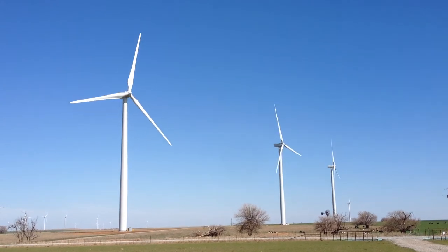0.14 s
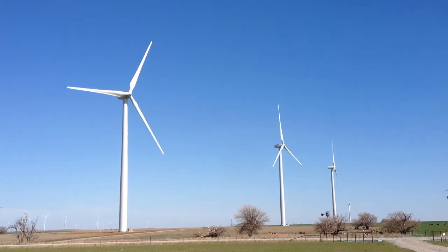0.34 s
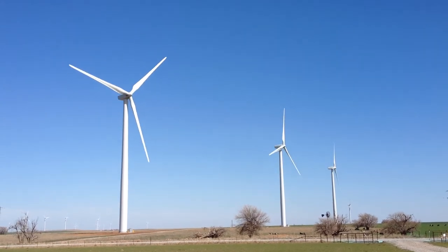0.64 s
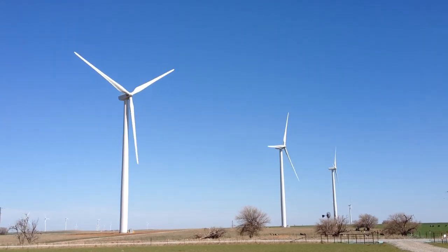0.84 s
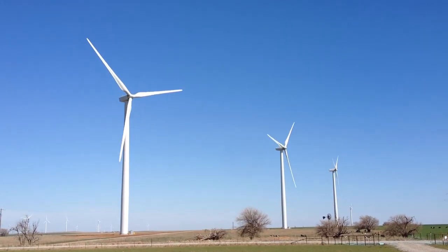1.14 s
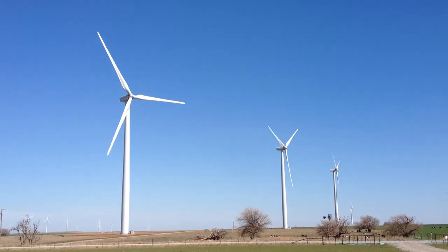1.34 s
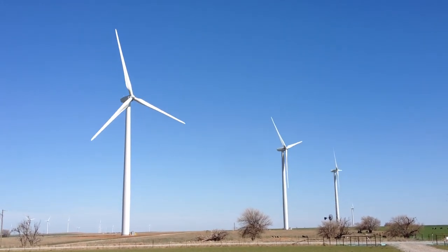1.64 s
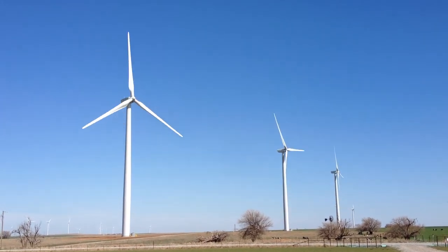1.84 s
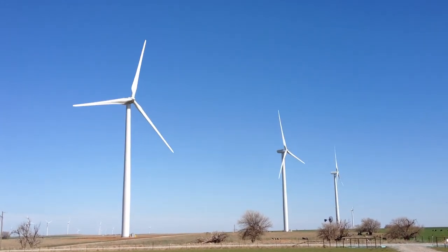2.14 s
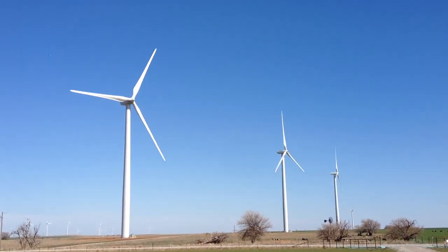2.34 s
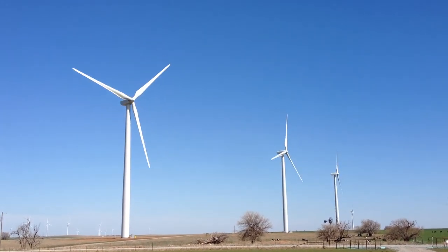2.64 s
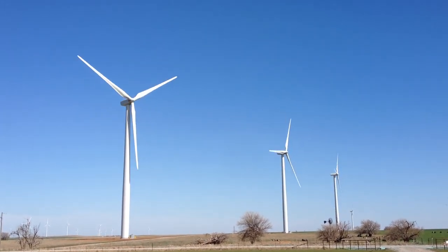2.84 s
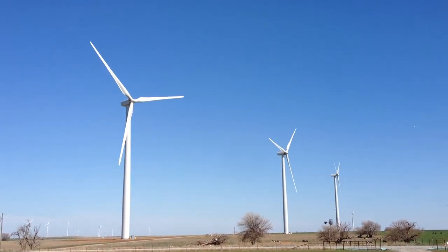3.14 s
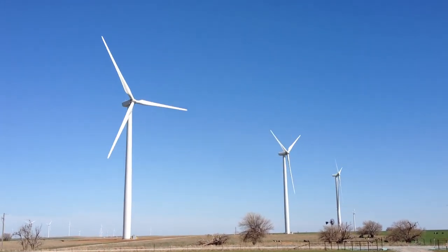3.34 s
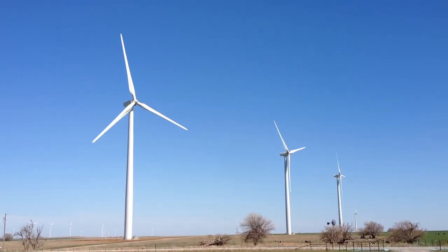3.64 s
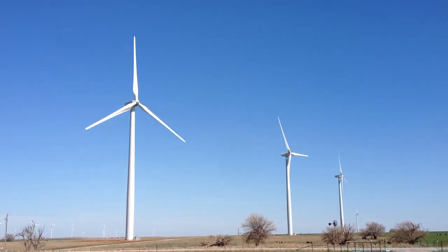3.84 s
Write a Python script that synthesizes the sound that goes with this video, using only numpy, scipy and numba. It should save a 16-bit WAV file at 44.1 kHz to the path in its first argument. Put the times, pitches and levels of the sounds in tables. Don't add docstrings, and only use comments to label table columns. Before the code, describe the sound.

Heavy wind gusts thump and flutter on a small microphone, then die away to faint hiss

```python
import sys
import numpy as np
from scipy import signal
from scipy.fft import rfft, irfft
from scipy.io import wavfile
from scipy.ndimage import uniform_filter1d, minimum_filter1d
from numba import njit

SR = 44100
rng = np.random.default_rng(int(sys.argv[2]) if len(sys.argv) > 2 else 0)


def amplitude_ratio(level_db):
    exponent = np.asarray(level_db, float) / 20
    return 10 ** exponent


def master(y):
    cut = np.clip(np.atleast_2d(y).T, -1, 1)
    pcm = np.round(cut * 32767)
    wavfile.write(sys.argv[1], SR, pcm.astype(np.int16))


N = 176400

# (frequency [Hz], density [dB per Hz])
FIELD_SPECTRUM = [(40, -37), (90, -14), (200, -10.5), (500, -15.5), (1200, -22), (2400, -20.5),
                  (3100, -39.5), (5000, -27)]
# (frequency [Hz], density [dB per Hz])
HISS_SPECTRUM = [(3000, -54), (6000, -35.5), (8500, -37.5), (10000, -44), (12000, -38), (15500, -35.5)]
# (time [s], length [s], level [dB], centre [Hz])
BLADE_SWISHES = [
    (.14, .04, -71, 3500),
    (1.35, .22, -66, 1900),
    (1.22, .08, -69, 2800),
    (2.73, .11, -61, 1950),
    (2.58, .09, -69, 1550),
    (.513, .004, -66, 4300),
]
# (time [s], pitch [Hz], level [dB])
BIRD_PEEP = [(1.0, 4400, -85), (1.032, 4500, -72), (1.05, 4380, -72), (1.086, 4530, -64), (1.1, 4420, -80),
             (1.13, 4400, -66), (1.166, 4380, -61), (1.25, 4260, -70), (1.3, 4250, -82)]
# (time [s], peak [dB], ring [Hz], ring t60 [s])
CASE_TICKS = [(1.254, -56.5, 6500, 0.0062), (3.479, -51, 9300, 0.028), (3.4864, -38, 4570, 0.028),
              (3.503, -46, 3970, 0.021), (3.524, -53, 3740, 0.016), (3.6272, -39, 3900, 0.022),
              (3.628, -38.5, 2440, 0.0093), (3.621, -60, 9100, .015), (3.585, -63, 3000, .01),
              (3.646, -58, 4000, .015), (3.894, -53, 4840, 0.013), (3.915, -54, 5630, 0.018)]
# (time [s], length [s], level [dB], pitch [Hz], glide [Hz per s])
WHISTLE_STRANDS = [(.26, .04, -66, 2110, 0), (1.06, .05, -69, 1670, 500), (1.2, .035, -68, 1670, -500),
                   (1.16, .045, -67, 2070, 300), (1.11, .04, -70, 1860, 0), (1.33, .06, -67, 1940, 0),
                   (1.47, .06, -70, 1850, 0), (1.54, .045, -69, 1640, 100), (1.73, .03, -71, 1850, 300),
                   (1.69, .03, -69, 2570, 0), (2.13, .04, -73, 1560, 0), (2.52, .05, -71, 1500, 0),
                   (2.63, .035, -68, 2030, 700), (2.77, .03, -70, 1500, 0), (2.74, .04, -70, 1850, 900),
                   (3.07, .035, -67, 2700, 900), (3.26, .03, -70, 2800, 900), (3.1, .06, -70, 2400, -200),
                   (.125, .015, -66, 3320, -1500), (.185, .015, -69, 3700, -1500),
                   (3.95, .03, -82, 4900, -3000)]
# (time [s], pitch [Hz], level [dB])
EDGE_WHISTLE = [(0, 2260, -56), (.1, 2158, -56), (.19, 1913, -55), (.33, 1877, -59.5), (.45, 1959, -55.5),
                (.69, 2105, -56.5), (.93, 1962, -60.5), (1.0, 2232, -62), (1.15, 2354, -62),
                (1.82, 2340, -61.5), (1.92, 2438, -53.5), (2.08, 2440, -56.5), (2.2, 2505, -70.5),
                (2.62, 2510, -50), (2.9, 2540, -60), (3.08, 2580, -59), (3.42, 2510, -61), (4, 2485, -74)]
# (time [s], level [dB])
EARLY_SNAPS = [(0.016, -19), (0.033, -29), (0.066, -20), (0.087, -21), (0.096, -23), (0.105, -19.5),
               (0.119, -22.5), (0.143, -20.5), (0.16, -15.5), (0.184, -19), (0.225, -37), (0.238, -19),
               (0.276, -42), (0.286, -36), (0.345, -20.5), (0.4, -17), (0.44, -21), (0.47, -19.5),
               (0.495, -21), (0.522, -17.5), (0.544, -18), (0.657, -24), (0.694, -22.5), (0.702, -21.5),
               (0.766, -22)]
# (time [s], level [dB])
LATE_SNAPS = [(0.781, -21.5), (0.81, -18.5), (0.816, -18.5), (0.831, -18), (0.893, -17), (0.904, -21.5),
              (0.915, -19), (0.923, -22.5), (0.951, -18), (0.969, -19.5), (0.981, -17.5), (1.012, -20),
              (1.057, -40), (1.067, -22), (1.094, -35), (1.202, -21.5), (1.239, -40), (1.255, -22),
              (1.287, -21), (1.318, -23), (1.343, -22.5), (1.471, -22), (1.541, -28), (1.604, -26),
              (1.62, -22.5), (1.671, -22.5), (1.791, -27), (1.871, -22.5), (1.881, -21.5), (1.89, -23.5),
              (1.941, -26), (2.025, -27), (2.09, -26.5), (1.902, -22.5), (1.987, -22)]
# (time [s], level [dB], extra sharpness [dB])
WIND_BED = [(0, -25.5, 0), (.3, -25.5, -0.5), (.62, -33.5, -1.5), (.8, -35, 3), (.99, -29.5, 4),
            (1.05, -40.5, -3.5), (1.3, -35, 1.5), (1.42, -45.5, -6.5), (1.72, -45, -10), (1.77, -45, -8),
            (2.17, -32, -11), (2.22, -49, -12), (2.34, -61, -3), (2.5, -58.5, -20.5), (2.52, -45, -9.5),
            (2.72, -54.5, -15.5), (2.84, -60.5, -12), (4, -59.5, -15.5)]
# (time [s], peak [dB])
STRONG_BUFFETS = [(0.035, -16), (0.097, -10), (0.164, -5.5), (0.226, -10.5), (0.265, -13), (0.296, -19),
                  (0.352, -17.5), (0.404, -15.5), (0.439, -9.5), (0.521, -7.5), (0.543, -10.5),
                  (0.607, -16.5), (0.661, -24.5), (0.722, -14), (0.765, -19.5), (.797, -9), (0.841, -11),
                  (0.874, -15.5), (.954, -16.5), (0.982, -7.5), (1.014, -13), (1.062, -21.5),
                  (1.094, -16.5), (1.129, -23.5)]
# (time [s], peak [dB])
FALLING_BUFFETS = [(1.195, -23.5), (1.243, -17.5), (1.291, -17), (1.32, -15), (1.341, -27), (1.367, -27.5),
                   (1.405, -34), (1.428, -26), (1.476, -18), (1.544, -29.5), (1.608, -24.5), (1.676, -16.5),
                   (1.797, -20.5), (1.822, -24), (1.858, -23), (1.884, -16), (1.988, -18), (2.025, -22.5),
                   (2.049, -17.5), (2.092, -22.5), (2.17, -27), (2.24, -40), (2.274, -42), (2.306, -36),
                   (2.533, -32), (2.591, -27), (2.646, -29.5), (2.683, -28.5), (2.717, -29.5), (3.125, -36)]
# (time [s], peak [dB])
FURTHER_BUFFETS = [(2.78, -44.5), (3.086, -43.5), (3.283, -40), (3.855, -42.5), (3.95, -40), (0.015, -15.5),
                   (0.468, -27), (0.494, -23), (0.81, -9.5), (0.894, -17.5), (1.961, -20.5), (2.559, -33.5)]
# (time [s], peak [dB])
SHOULDER_BUFFETS = [(0.055, -19), (0.074, -17), (0.121, -22), (.14, -19), (.181, -11), (0.25, -20.5),
                    (.325, -27), (.372, -22.5), (0.427, -25), (0.453, -16.5), (.565, -21), (.586, -20.5),
                    (.703, -19.5), (0.746, -24), (0.828, -16), (0.853, -22), (0.884, -13), (.908, -19),
                    (.93, -24), (0.994, -22.5), (1.033, -29), (1.177, -25), (1.22, -25), (1.259, -17),
                    (1.275, -30), (1.447, -26.5), (1.495, -29.5), (1.623, -37), (1.656, -30.5),
                    (1.701, -24), (1.76, -23), (1.776, -25), (1.84, -23.5), (1.903, -25), (1.925, -30.5),
                    (1.94, -21), (2.003, -40), (2.07, -32.5), (2.115, -31.5), (2.142, -32), (2.18, -23.5),
                    (2.202, -34.5), (2.611, -42.5), (2.666, -46.5)]
# (passing time [s], share in strong wind [dB], extra growth [dB per dB], rate [eddies per s])
EDDY_SIZES = [
    (0.0018, -4.5, 0., 1000),
    (0.00078, -6.5, 1, 900),
    (0.00043, -16.5, 2.5, 500),
]

MIC_LOW_HZ, PORT_TOP_HZ = 174, 2220
RING_HZ, RING_WIDTH_HZ, RING_SHARE = 164, 99, 0.27
SLOT_HZ, SLOT_WIDTH_HZ, SLOT_SHARE = 545, 310, 0.39
BUFFET_S, BUFFET_DB, FLUTTER_DB = 0.0076, -4, 3.5
EDDY_SCATTER_DB, EVEN_S = 1, 0.01
SNAP_S, SNAP_SHRINK_PER_DB, SNAP_SCATTER, SNAP_DB = 0.00034, 0.17, 0.013, 12
WHISTLE_WIDTH_HZ, WHISTLE_DB, STRAND_WIDTH_HZ = 32, -1, 70
SKIRT_WIDTH_HZ, SKIRT_DB = 600, -4.5
WAVER_DB, WAVER_PER_S = 1.3, 25
CRACK_DB, FIELD_DB = 7.5, -58
LIMIT, LIMIT_S = 0.68, 0.008
FADE_IN_S, FADE_IN_SHARE = 0.00067, 0.66
RUMBLE_HZ, TOP_HZ = 58, 15340


def curve(rows, col):
    rows = np.array(rows, float)
    return np.interp(np.arange(N) / SR, rows[:, 0], rows[:, col])


@njit
def svf(x, hz, width):
    y, b, l = np.empty(len(x)), 0., 0.
    for i in range(len(x)):
        g, k = np.tan(np.pi * hz[i] / SR), width[i] / hz[i]
        v = (b + g * (x[i] - l)) / (1 + g * (g + k))
        b, l, y[i] = 2 * v - b, l + 2 * g * v, k * v
    return y


def smooth(x, size, times):
    for _ in range(times):
        x = uniform_filter1d(x, size)
    return x


def band(hz, width_hz, order=1, even_s=0.21):
    x, one = rng.standard_normal(N), np.ones(N)
    for _ in range(order):
        x = svf(x, np.clip(hz * one, 30, 18000), np.clip(width_hz * one, 5, 9000))
    power = smooth(x ** 2, int(even_s * SR), 2)
    return x / np.sqrt(power + 1e-12)


def walk(rate):
    hold = int(SR / rate)
    levels = rng.standard_normal(N // 50)[:N // hold + 1]
    return 2.36 * smooth(np.repeat(levels, hold), hold, 2)[:N]


def hump(at_s, length_s):
    out, i, reach = np.zeros(N), int(at_s * SR), int(5 * length_s * SR)
    k = np.arange(max(i - reach, 0), min(i + reach, N))
    out[k] = np.exp(-.5 * ((k / SR - at_s) / length_s) ** 2)
    return out


def log_interp(hz, spectrum):
    table_hz, table_db = np.transpose(spectrum)
    return np.interp(np.log(hz), np.log(table_hz), table_db)


def floor():
    field, swell = 0, walk(1.46)
    for hz in 45 * 2 ** np.arange(0, 7, .5):
        level_db = log_interp(hz, FIELD_SPECTRUM) + 0.5 * swell + 0.45 * walk(12)
        field = field + amplitude_ratio(level_db) * np.sqrt(hz / 200) * band(hz, hz / 2, order=2)
    f = np.arange(N // 2 + 1) * SR / N + 1
    gain = amplitude_ratio(log_interp(f, HISS_SPECTRUM))
    hiss = np.sqrt(SR / 150) * irfft(rfft(rng.standard_normal(N)) * gain, N)
    return amplitude_ratio(FIELD_DB) * (field + hiss)


def swishes():
    return sum(amplitude_ratio(db) * hump(s, length) * band(hz, 0.19 * hz, order=2)
               for s, length, db, hz in BLADE_SWISHES)


def bird():
    t = np.arange(N) / SR
    gate = (t > BIRD_PEEP[0][0]) & (t < BIRD_PEEP[-1][0])
    hz = curve(BIRD_PEEP, 1) + 15 * walk(65)
    tone = np.sqrt(2) * np.sin(2 * np.pi * np.cumsum(hz) / SR)
    return gate * amplitude_ratio(curve(BIRD_PEEP, 2)) * tone


def ticks():
    out, t = np.zeros(N), np.arange(SR // 30) / SR
    one = np.ones(len(t))
    for s, db, hz, t60 in CASE_TICKS:
        noise = rng.standard_normal(len(t))
        fall = np.exp(-np.log(1000) * t / t60)
        ring, crack = noise * fall, noise[::-1] * fall ** 2.3
        for _ in range(2):
            ring = svf(ring, hz * one, 0.31 * hz * one)
            crack = svf(crack, 1200 * one, 2400 * one)
        i = int(s * SR)
        out[i:i + len(t)] += amplitude_ratio(db) * (ring / np.abs(ring).max() + amplitude_ratio(CRACK_DB) * crack)
    return out


def strands():
    t, hz, gain = np.arange(N) / SR, np.full((3, N), 2000.), np.zeros((3, N))
    for k, (s, length, db, pitch_hz, glide) in enumerate(sorted(WHISTLE_STRANDS)):
        voice, near = k % len(hz), np.abs(t - s) < 2 * length
        hz[voice, near] = pitch_hz + glide * (t[near] - s)
        gain[voice, near] = amplitude_ratio(db) * np.exp(-((t[near] - s) / (1.4 * length)) ** 4)
    return sum(g * band(f + 20 * walk(30), STRAND_WIDTH_HZ, order=2, even_s=.05)
               for f, g in zip(hz, gain))


def whistle():
    hz = curve(EDGE_WHISTLE, 1) + 9 * walk(32)
    tone = band(hz, WHISTLE_WIDTH_HZ, order=2, even_s=.04)
    skirt = amplitude_ratio(SKIRT_DB) * band(0.989 * hz, SKIRT_WIDTH_HZ, order=3)
    level_db = curve(EDGE_WHISTLE, 2) + WHISTLE_DB + WAVER_DB * walk(WAVER_PER_S)
    return amplitude_ratio(level_db) * (tone + skirt)


def port(pulses, passing_s):
    f, one = np.arange(N // 2 + 1) * SR / N, np.ones(N)
    dulling = np.exp(-2 * np.pi * passing_s * f - (f / PORT_TOP_HZ) ** 2)
    dips = irfft(rfft(pulses) * dulling, N)
    dips = signal.sosfilt(signal.butter(4, MIC_LOW_HZ, "high", fs=SR, output="sos"), dips)
    ring = RING_SHARE * svf(dips, RING_HZ * one, RING_WIDTH_HZ * one)
    slot = SLOT_SHARE * svf(dips, SLOT_HZ * one, SLOT_WIDTH_HZ * one)
    return dips + ring + slot


def snaps():
    half = SR // 40
    out, t = np.zeros(N + 2 * half), np.arange(-half, half) / SR
    for s, db in EARLY_SNAPS + LATE_SNAPS:
        scatter = SNAP_SCATTER * rng.standard_normal()
        wide = SNAP_S * np.exp(-SNAP_SHRINK_PER_DB * (db + 18.5) + scatter)
        i = int(s * SR)
        out[i:i + 2 * half] -= amplitude_ratio(db + SNAP_DB) * (SNAP_S / wide) / (1 + (t / wide) ** 2)
    return port(out[half:N + half], 0)


def wind():
    power = amplitude_ratio(curve(WIND_BED, 1) + FLUTTER_DB * walk(45)) ** 2
    for s, db in STRONG_BUFFETS + FALLING_BUFFETS + FURTHER_BUFFETS + SHOULDER_BUFFETS:
        power = power + (amplitude_ratio(db + BUFFET_DB) * hump(s, BUFFET_S)) ** 2
    swell = np.sqrt(power)
    quick_db = uniform_filter1d(20 * np.log10(swell) + 20, size=200)
    strength_db = 0.54 * quick_db + curve(WIND_BED, 2)
    stream = 0
    for passing_s, db, growth, rate in EDDY_SIZES:
        arrives = rng.random(N) < rate / SR
        sign, size = rng.standard_normal(N), rng.exponential(size=N)
        eddies = port(arrives * sign * amplitude_ratio(EDDY_SCATTER_DB * size), passing_s)
        stream = stream + amplitude_ratio(db + growth * strength_db) * eddies / eddies.std()
    stream_power = smooth(stream ** 2, int(EVEN_S * SR), 3)
    return swell * stream / np.sqrt(stream_power + 0.034 * stream_power.mean())


def scene():
    at_port = wind() + snaps()
    at_edges = whistle() + strands()
    around = bird() + swishes() + ticks() + floor()
    return (at_port + at_edges + around)[None]


def roll_off(x):
    return signal.sosfilt(signal.butter(12, 16200, fs=SR, output="sos"), x)


def record(dry):
    k = int(LIMIT_S * SR)
    needed = np.minimum(1, LIMIT / (np.abs(dry) + 1e-9))
    gain = uniform_filter1d(minimum_filter1d(needed, 2 * k + 1), k)
    gain = gain * (1 - FADE_IN_SHARE * np.exp(-np.arange(N) / SR / FADE_IN_S))
    f = np.arange(N + 1) * SR / (2 * N)
    rumble_cut = np.maximum(f ** 2 / (f ** 2 + RUMBLE_HZ ** 2), amplitude_ratio(-10.5))
    mix = irfft(rfft(dry * gain, 2 * N) * (f < TOP_HZ) * rumble_cut)[:, :N]
    return roll_off(mix)


dry = scene()
out = record(dry)
master(out)
```